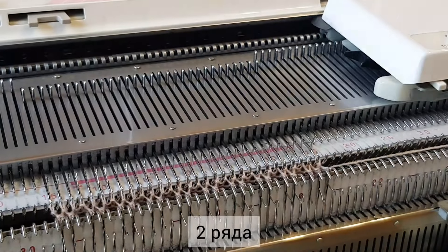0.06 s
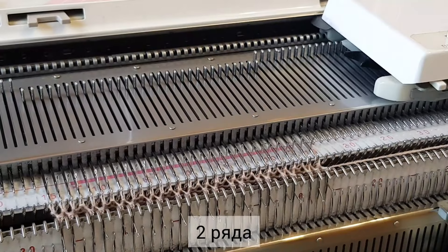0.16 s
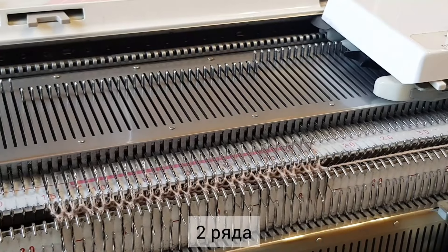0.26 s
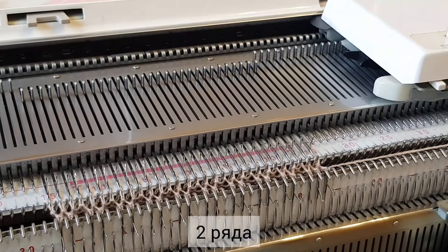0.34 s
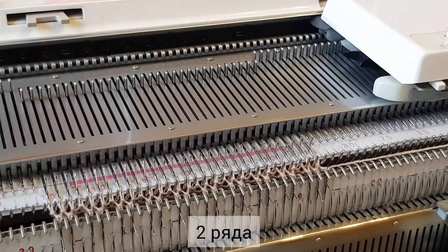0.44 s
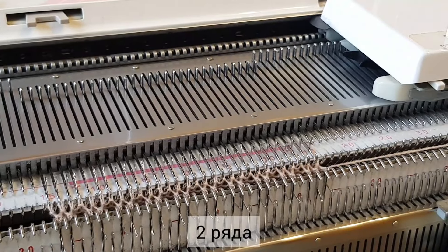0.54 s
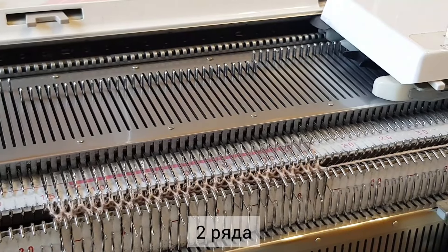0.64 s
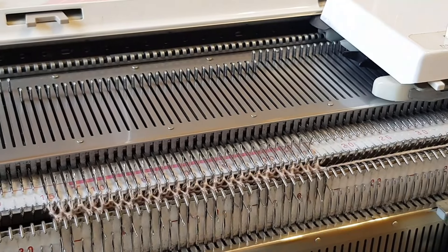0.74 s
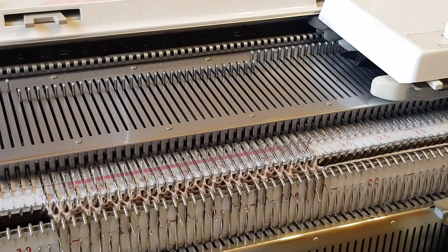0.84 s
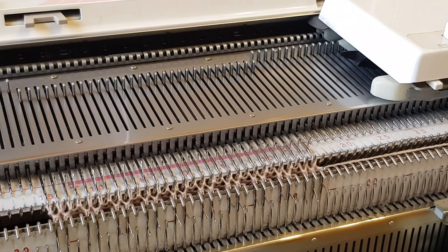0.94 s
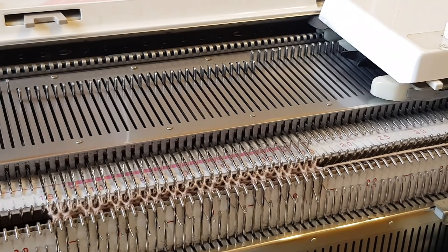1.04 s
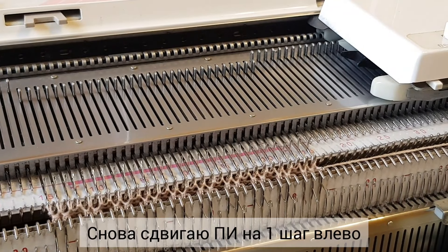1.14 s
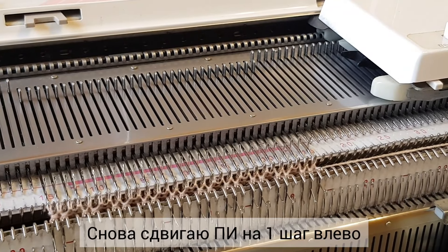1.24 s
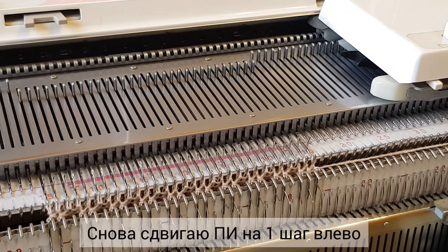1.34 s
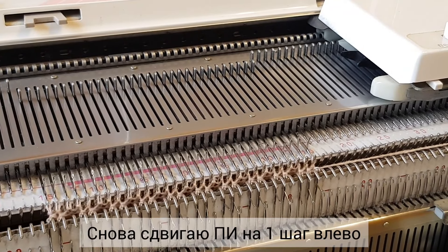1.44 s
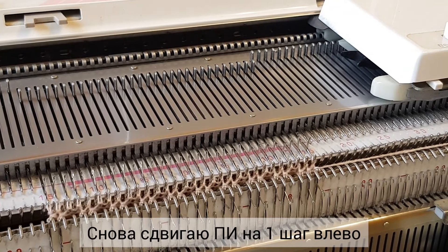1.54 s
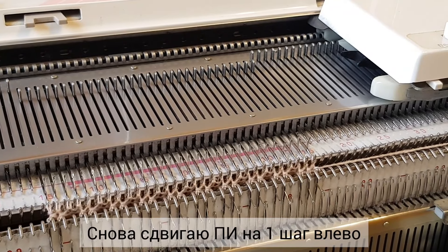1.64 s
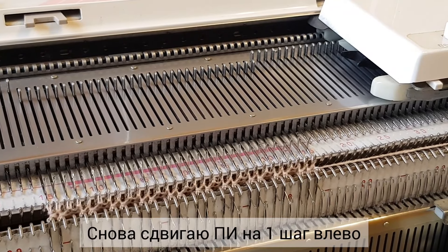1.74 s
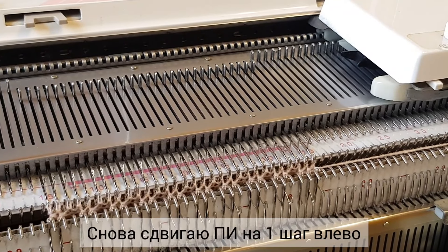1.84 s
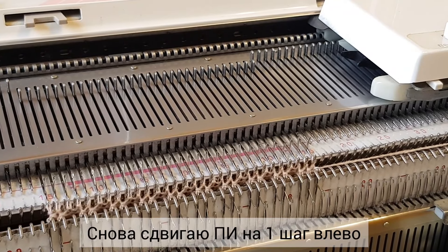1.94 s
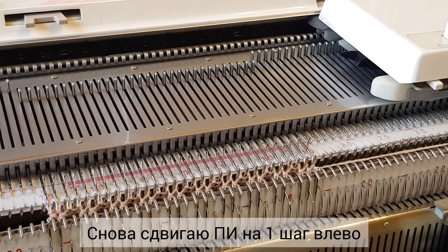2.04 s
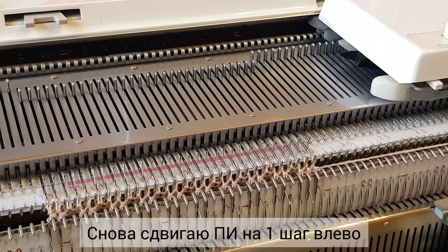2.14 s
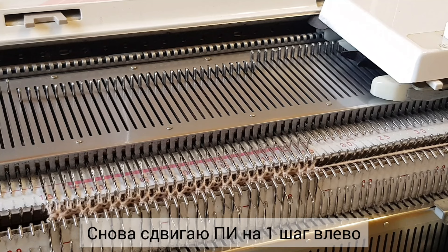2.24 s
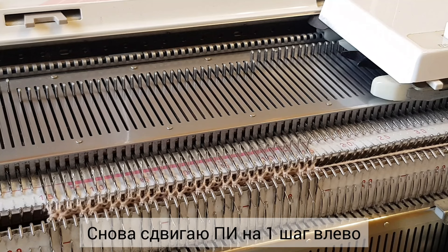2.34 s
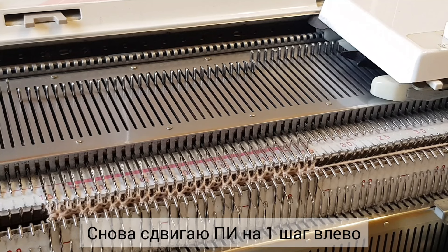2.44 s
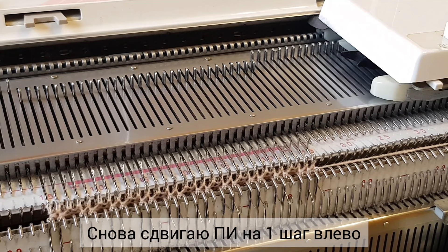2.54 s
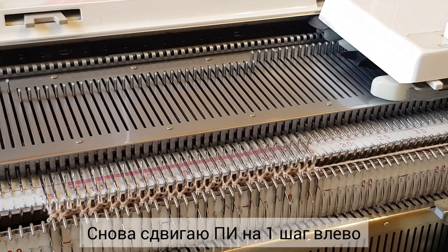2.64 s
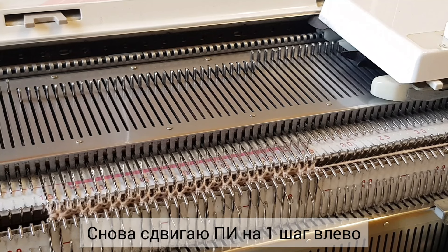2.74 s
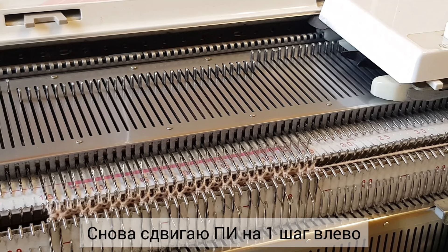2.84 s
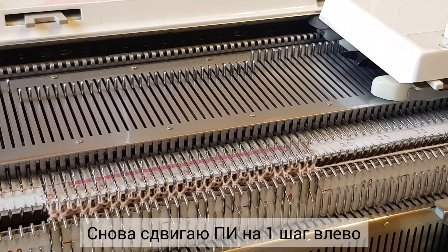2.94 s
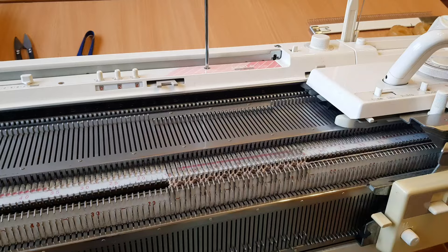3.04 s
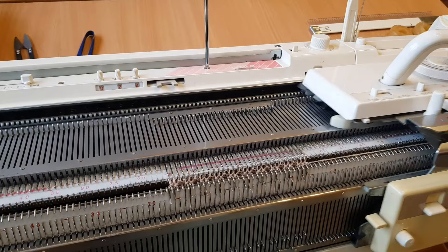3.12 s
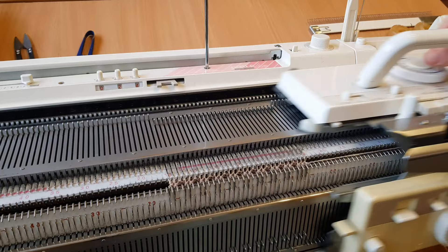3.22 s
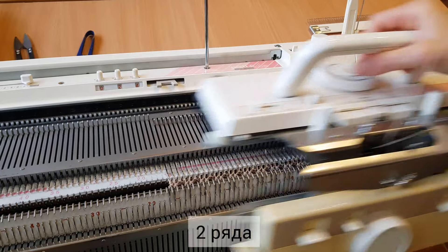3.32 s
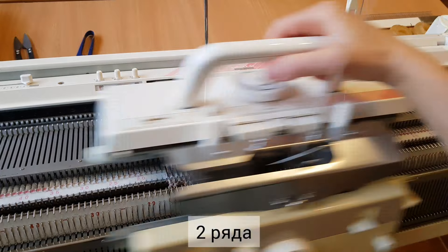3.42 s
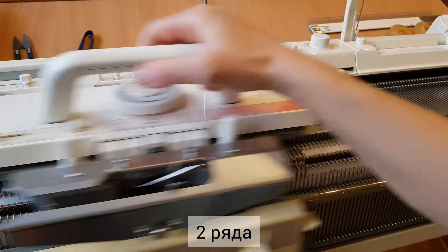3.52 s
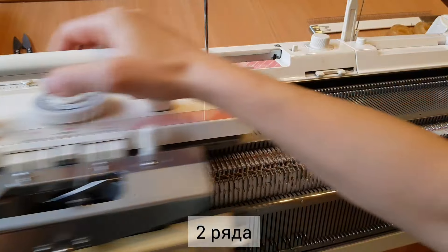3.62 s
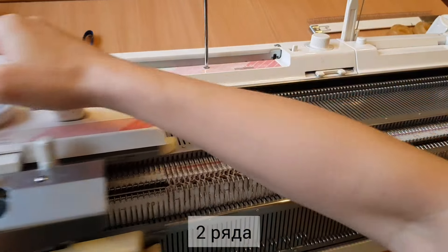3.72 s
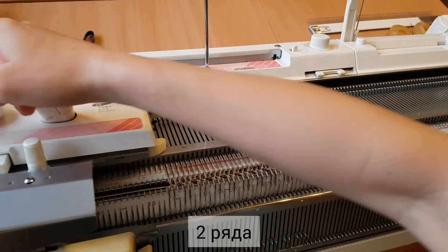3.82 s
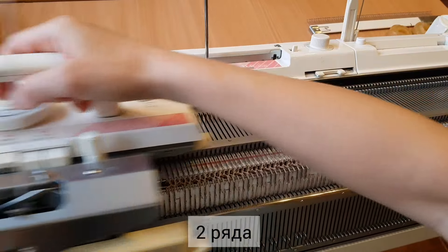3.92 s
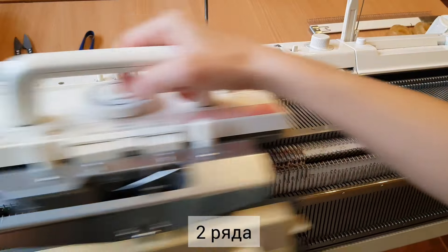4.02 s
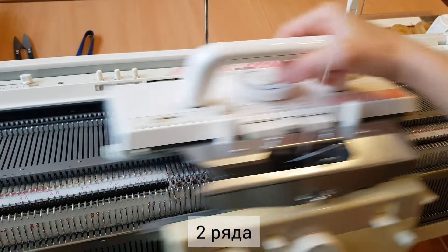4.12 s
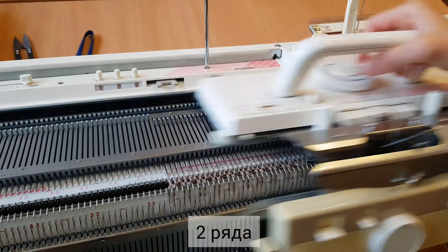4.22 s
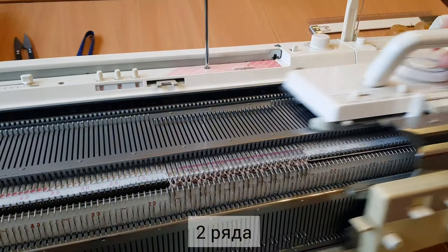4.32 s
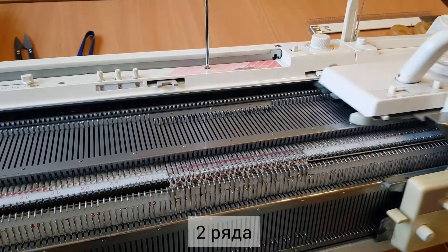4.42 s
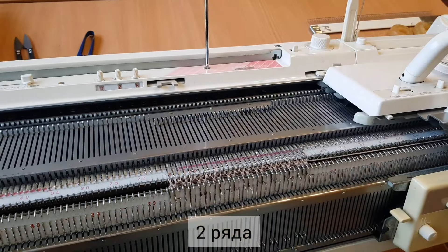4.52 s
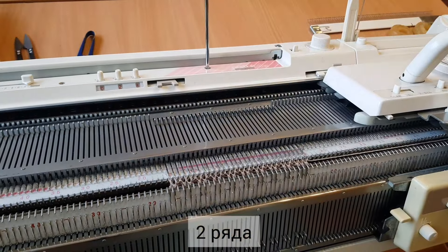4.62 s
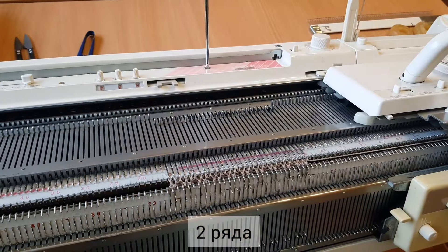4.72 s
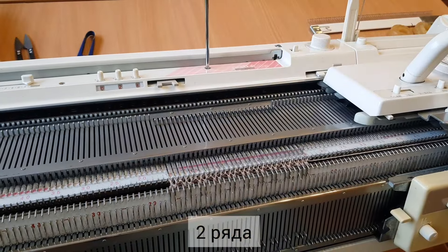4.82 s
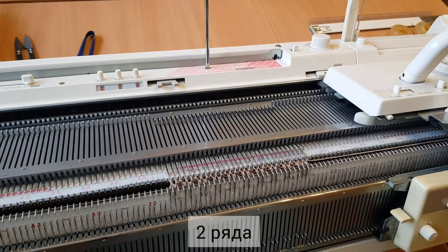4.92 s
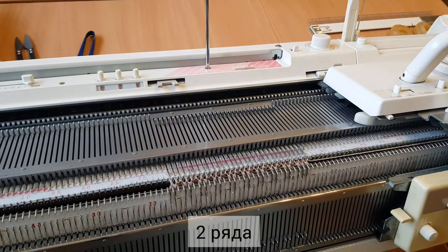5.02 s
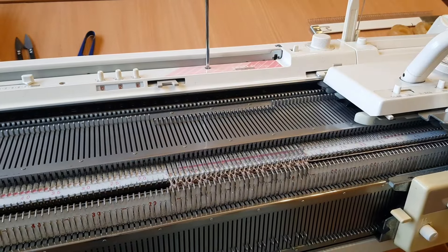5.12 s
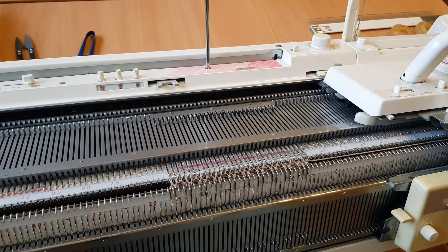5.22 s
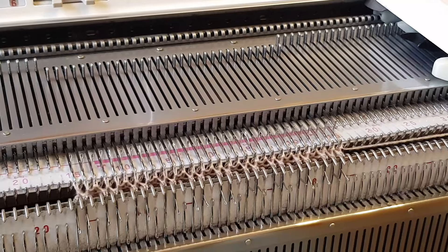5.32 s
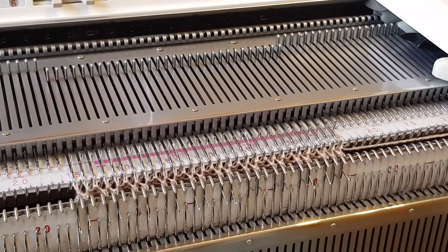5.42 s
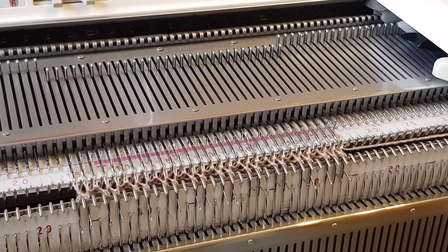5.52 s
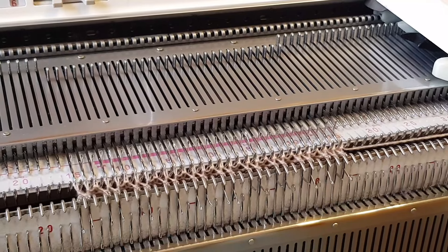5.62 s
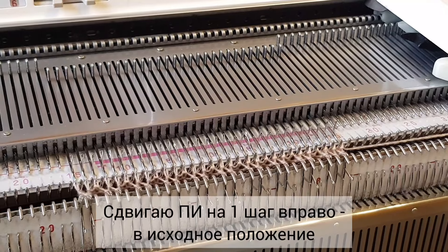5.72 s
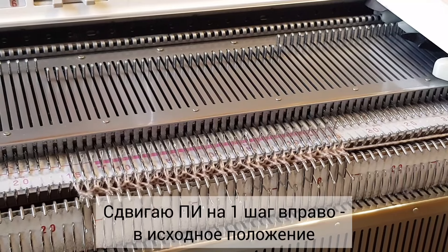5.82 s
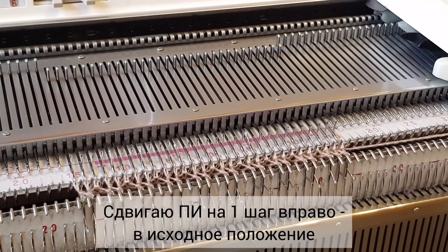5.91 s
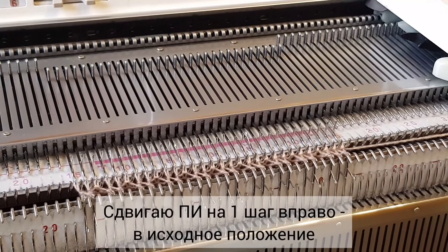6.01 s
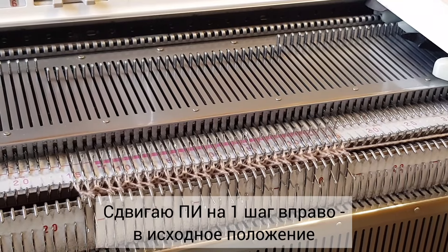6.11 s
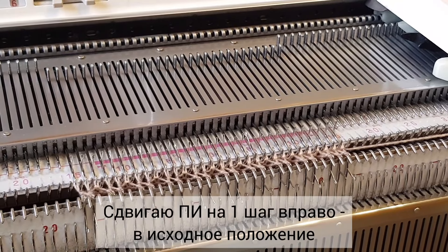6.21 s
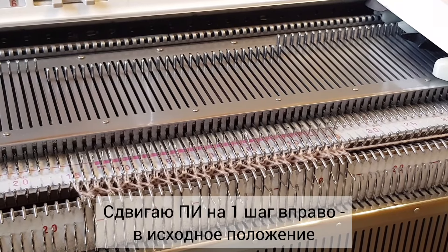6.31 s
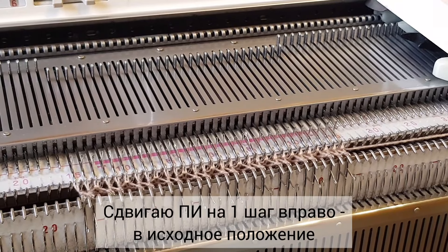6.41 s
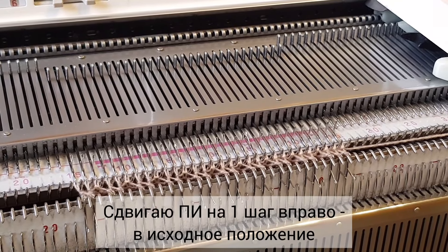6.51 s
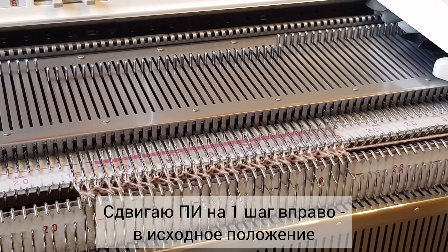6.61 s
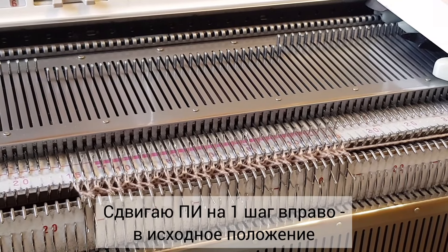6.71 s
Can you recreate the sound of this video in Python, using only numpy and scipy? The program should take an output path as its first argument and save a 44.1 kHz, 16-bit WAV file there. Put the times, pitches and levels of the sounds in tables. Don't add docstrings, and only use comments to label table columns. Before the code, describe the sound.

After a quiet opening, a lever clunks dully, then a knitting machine carriage rasps loudly out and back over needles, and a softer clunk follows.

```python
import sys
import numpy as np
from scipy import signal
from scipy.io import wavfile

SR = 44100
rng = np.random.default_rng(int(sys.argv[2]) if len(sys.argv) > 2 else 0)


def boost_factor(decibels):
    exponent = np.asarray(decibels, float) / 20
    return 10 ** exponent


def wav_record(signal):
    frames = np.transpose(np.atleast_2d(signal))
    bounded = np.clip(frames, -1, 1)
    quanta = np.round(bounded * 32767).astype(np.int16)
    wavfile.write(sys.argv[1], SR, quanta)


N = 298097

# frequency in Hz, level in dB per Hz.
RASP_SPECTRUM = [(180, -36), (300, -7.5), (372, -2), (528, -6.5), (603, 1.5), (656, -4.5), (994, -0.5),
                 (1640, -5.5), (3290, -4.5), (3760, -12), (4990, -6.5), (6410, -9.5), (8090, -11),
                 (12700, 2.5), (16000, -8)]
# frequency in Hz, likeness from -1 to 1.
MACHINE_LIKENESS = [(60, 0.88), (130, 0.94), (290, 0.8), (640, 0.29), (1410, 0.2), (3100, -0.01),
                    (6820, 0.0), (15000, -0.01)]
# frequency in Hz, level in dB, 60 dB decay in seconds.
BED_MODES = [(58, -7, 0.53), (129.7, -7, 0.6), (172.5, 0, 0.2), (208.2, -10, 0.46), (339, -17, 0.13),
             (391, -22, 0.5), (447, -26, 1), (563, -26.5, 0.43), (824, -29, 0.16)]


def curves(tables, rest):
    t = np.arange(N) / SR
    out = None
    for rows in tables:
        s, *columns = np.transpose(rows)
        if out is None:
            out = np.full((len(columns), N), rest)
        inside = (t >= s[0]) & (t <= s[-1])
        out[:, inside] = [np.interp(t[inside], s, c) for c in columns]
    return out


def rms_one(x):
    return x / np.sqrt(np.mean(x ** 2) + 1e-20)


def at_hz(points, hz):
    points_hz, values = np.transpose(points)
    return np.interp(np.log(hz), np.log(points_hz), values)


def sides(pan_db):
    return boost_factor(np.multiply.outer([.5, -.5], pan_db))


def drift(rate):
    r = np.exp(-80 * np.pi * rate / SR)
    slow = signal.lfilter([1], [1, -2 * r, r * r], rng.standard_normal(N // 40 + 2002))[2000:]
    return np.interp(np.arange(N) / 40, np.arange(len(slow)), rms_one(slow))


def ring(x, hz, t60):
    r = boost_factor(-60 / (t60 * SR))
    w = 2 * np.pi * hz / SR
    return signal.lfilter([0, np.sin(w)], [1, -2 * r * np.cos(w), r * r], x + 1e-18)


def clicks(times, gains):
    out = np.zeros(np.shape(gains)[:-1] + (N,))
    out[..., (np.asarray(times) * SR).astype(int)] = gains
    return out


def fades(times, gains, t60s):
    out = np.zeros(np.shape(gains)[:-1] + (N,))
    for k, (s, t60) in enumerate(zip(times, np.clip(t60s, .005, 1))):
        tail = out[..., int(s * SR):int((s + 1.5 * t60) * SR)]
        tail += gains[..., k, None] * boost_factor(-60 * np.arange(tail.shape[-1]) / SR / t60)
    return out


def swells(rows):
    t = np.arange(N) / SR
    out = 0
    for s, db, rise, fall in rows:
        away = np.maximum((s - t) / max(rise, .02), (t - s) / max(fall, .02))
        out = out + boost_factor(db - 60 * away)
    return out


def coloured(spectrum, edges, likeness, grain=1, patchy_db=0., balance=((1, 0), (2, 0))):
    out = 0
    white = grain * rng.standard_normal((2, 2, N))
    steps = np.geomspace(*edges, 1 + round(2 * np.log2(edges[1] / edges[0])))
    for k, (low, high) in enumerate(zip(steps, steps[1:])):
        band = signal.butter(2, [low, high], "band", fs=SR, output="sos")
        mid, side = signal.sosfilt(band, white[k % 2])
        hz = np.sqrt(low * high)
        alike = np.clip(at_hz(likeness, hz), -1, 1)
        flicker = boost_factor(patchy_db * drift(15.5)) if patchy_db else 1
        gain = boost_factor(at_hz(spectrum, hz)) * sides(at_hz(balance, hz))[:, None]
        stereo = np.sqrt(1 + alike) * mid + np.sqrt(1 - alike) * side * [[1], [-1]]
        out = out + gain * flicker * stereo
    return rms_one(out)


def resonant(modes):
    out = 0
    for hz, width, db in modes:
        t60 = np.log(1000) / np.pi / width
        out = out + boost_factor(db) * rms_one(ring(rng.standard_normal(N), hz, t60))
    return out


def room():
    # start in seconds, level in dB of rumble, house, hiss and fan.
    steady = [
        (0, -84, -68, -89, -79),
        (.835, -73, -61, -82, -90),
        (3.75, -81, -68.5, -89, -88.5),
        (5.275, -73.5, -60, -82, -73.5),
    ]
    # top in seconds, level in dB, rise and fall over 60 dB in seconds.
    rumble_swells = [
        (1.48, -49.5, .35, .75),
        (1.75, -73.5, 0.81, 5.5),
        (3.138, -62, .5, -1),
        (6.14, -59, 0.71, 2),
        (6.65, -51.5, 1.8, 0.7),
    ]
    house_swells = [
        (0.0, -56.5, .1, 0.69),
        (1.4, -54, .5, 1.13),
        (5.36, -61.5, 0.25, 0.7),
        (6.12, -59, 0.82, 0.88),
    ]
    fan_swells = [
        (5.43, -64, 0.83, 1.7),
    ]
    # frequency in Hz, level in dB per Hz.
    house_spectrum = [(53, -44), (90, -15), (114, -8.5), (243, -4), (268, -8), (345, -12.5), (369, -17),
                      (415, -14), (526, -17), (562, -14.5), (748, -15.5), (979, -22), (5000, -44),
                      (6500, -74), (11000, -120)]
    fan_spectrum = [(410, -30), (700, -1.5), (1140, -4.5), (1530, -6.5), (1690, -16), (1970, -14.5),
                    (2220, -21), (2600, -22), (3380, -52), (5720, -120)]
    hiss_spectrum = [(1470, -30), (2500, 0), (4410, -8), (4990, -7), (8020, -18.5), (12600, -6), (15200, 2),
                     (16000, -5)]
    # frequency in Hz, left-right likeness from -1 to 1.
    room_likeness = [(60, 0.85), (180, 0.15), (550, 0.64), (1650, -0.38), (4970, -0.06), (15000, 0.15)]
    # frequency in Hz, left minus right in dB.
    room_balance = [(60, 0), (110, -4), (200, 2), (380, 0.5), (700, 5), (1290, 4.5), (2380, 0.5),
                    (4400, 2.5), (8120, 1.0), (15000, 0.0)]
    # frequency in Hz, width in Hz, level in dB.
    hum_modes = [(55.4, 14, 0), (38, 22, -12)]
    drone_modes = [(270, 20, -2), (195, 20, -7.5), (122, 63, -12.5)]

    starts, *levels_db = np.transpose(steady)
    stretch = np.searchsorted(starts, np.arange(N) / SR, "right") - 1
    hum_gain, house_gain, hiss_gain, fan_gain = boost_factor(np.array(levels_db))[:, stretch]

    hum = rms_one(resonant(hum_modes))
    house = coloured(house_spectrum, (90, 5000), room_likeness, patchy_db=1.5, balance=room_balance)
    house = rms_one(house + resonant(drone_modes) * sides(2.5)[:, None])
    fan = coloured(fan_spectrum, (900, 1900), room_likeness, patchy_db=0.1, balance=room_balance)
    duct = signal.butter(6, 1750, fs=SR, output="sos")
    fan = rms_one(signal.sosfilt(duct, fan))
    hiss = coloured(hiss_spectrum, (4000, 17000), room_likeness)

    out = np.hypot(hum_gain, swells(rumble_swells)) * hum
    out = out + np.hypot(house_gain, swells(house_swells)) * house
    out = out + np.hypot(fan_gain, swells(fan_swells)) * fan
    return out + boost_factor(2.0) * hiss_gain * hiss


def rod():
    # frequency in Hz, 60 dB decay in seconds.
    rod_modes = [(4353, .45), (4311, .65), (4334, .45)]
    # strike in seconds, level in dB of each of the three modes.
    strikes = [
        (.001, -65.5, -67.5, -67.5),
        (3.70, -63, -73.5, -71),
        (3.781, -61.5, -74, -75),
        (4.271, -63.5, -63, -60.5),
    ]
    s, *levels_db = np.transpose(strikes)
    gains = boost_factor(np.array(levels_db))
    loose_play = fades(s, gains * boost_factor(-32), np.full(len(s), .45))
    force = clicks(s, gains) + rng.standard_normal(N) * loose_play
    rings = sum(ring(f, hz, t60) for f, (hz, t60) in zip(force, rod_modes))
    flutter = boost_factor(2.27 * drift(10.0))
    return rings * flutter * sides(6.0)[:, None]


def bed(force, damping, cut_hz):
    shares = sides(1.5 + 2.3 * rng.standard_normal(len(BED_MODES))).T
    rings = 0
    for share, f, (hz, db, t60) in zip(shares, force, BED_MODES):
        decay_s = damping * min(t60, 110 / hz + .15)
        rings = rings + share[:, None] * boost_factor(db) * ring(f, hz, decay_s)
    return signal.sosfilt(signal.butter(3, cut_hz, "high", fs=SR, output="sos"), rings)


def lever():
    # blow in seconds, peak in dB, hardness as dB of the upper modes, rustle in dB,
    # extra of the table top in dB.
    blows = [(0.001, -50.5, -13, -62.5, 0.5), (0.073, -48, -9, -67, -6), (0.893, -48.5, -2, -64.5, -4),
             (0.914, -53, 2, -69, -4), (1.317, -32.5, 2, -38, -6), (1.329, -23, -4.5, -42.5, -10),
             (1.349, -19.5, -20, -53, -8), (1.367, -24.5, -10, -56.5, -23), (1.395, -32, -23, -59, 6),
             (3.087, -45.5, -15, -58.5, 5), (3.118, -44.5, -12, -64.5, 2), (3.239, -51, -0.5, -60, -5),
             (5.359, -64.5, -6.5, -60.5, -0.5), (5.438, -49.5, -5.5, -48, -2),
             (5.454, -58.5, -7.5, -58.5, 0), (5.477, -50, -2, -76, 3), (5.958, -34, -8, -35.5, -9.5),
             (5.972, -31, -12.5, -65.5, -16.5), (5.999, -28, -18.5, -56.5, -3.5)]
    # frequency in Hz, level in dB per Hz.
    clunk_spectrum = [(180, -35), (300, -6.5), (372, -3), (531, -14.5), (574, -12), (806, -9), (1060, -19),
                      (1180, -15.5), (1970, -24.5), (2450, -24), (2770, -32), (4830, -34.5), (7440, -48),
                      (12000, -42.5), (15600, -74), (22000, -120)]
    s, low_db, hard_db, rustle_db, top_db = np.transpose(blows)
    t60 = np.full(len(s), .22)
    chance = rng.standard_normal((len(s), 2, len(BED_MODES)))
    upper = np.array(BED_MODES)[:, 0] > 280
    level_db = low_db[:, None] - 6.5 + upper * (hard_db[:, None] + 12.5) + 2.0 * chance[:, 0]
    level_db[:, 1] += top_db
    force = clicks(s, (boost_factor(level_db) * np.sign(chance[:, 1])).T)

    frame = coloured(clunk_spectrum, (300, 2700), MACHINE_LIKENESS)
    frame = frame * fades(s, boost_factor(rustle_db - 2.0), 1.3 * t60)
    needles = coloured(clunk_spectrum, (2700, 12000), MACHINE_LIKENESS)
    needles = needles * fades(s, boost_factor(rustle_db - 16.5), 0.73 * t60)
    return bed(force, damping=0.97, cut_hz=40) + (frame + needles) * sides(3.1)[:, None]


def steel(s, levels_db, pan_db, scatter_db, tail_db, tail_s):
    # frequency in Hz, level in dB, 60 dB decay in seconds.
    steel_modes = [(9030, -1.5, 0.041), (13100, -9, 0.014), (3100, -1, 0.012), (3700, -3, .012),
                   (5040, 2, 0.043), (10300, 0, 0.011), (5860, -3, 0.016)]
    part_of_mode = [0, 0, 1, 2, 3, 3, 0]
    chance = rng.standard_normal((len(s), 2 * len(steel_modes)))
    echoes = rng.standard_normal((2, N))
    out = 0
    for k, ((hz, db, t60), part) in enumerate(zip(steel_modes, part_of_mode)):
        gains = boost_factor(levels_db[part] + db + scatter_db * chance[:, 2 * k:2 * k + 2].T)
        echo_gains = gains * boost_factor(tail_db) * np.sqrt(.012 / t60)
        echo_s = np.full(len(s), tail_s * (3700 / hz) ** .7)
        force = clicks(s, gains) + echoes * fades(s, echo_gains, echo_s)
        out = out + ring(force, hz, t60)
    return out * sides(pan_db)[:, None]


def catch():
    # snap in seconds, level in dB of its spring, pin, pawl and plate.
    snaps = [(.0543, -75, -57, -71, -77), (.0728, -51.5, -58, -46, -77), (.8545, -71, -76, -63, -83),
             (1.284, -63, -90, -90, -76), (1.3294, -43, -70, -46, -52), (3.0674, -55, -81, -48.5, -72),
             (3.68, -27.5, -21, -39, -50), (3.781, -48, -65, -60, -44), (3.94, -56.5, -62, -60.5, -75.5),
             (3.975, -72, -57, -56.5, -71), (4.4846, -75.5, -73.5, -64, -72.5),
             (5.6102, -73.5, -87.5, -92, -80.5), (5.9453, -57, -56.5, -46.5, -59)]
    s, *levels_db = np.transpose(snaps)
    return steel(s, levels_db, pan_db=2.0, scatter_db=1.0, tail_db=-22.5, tail_s=.13)


def latches():
    # start in seconds,
    # peak in dB of the bright crack, level in dB of its duller part, left minus right in dB.
    rack_ticks = [(0.8536, -68, -63, -1), (1.2411, -63, -76, 6), (1.2724, -59, -83.5, 0),
                  (1.283, -57, -82, 1.5), (1.292, -48, -76, 5.5), (1.313, -52, -59, 1),
                  (1.3164, -50, -45.5, 11), (1.3268, -59, -43.5, -7), (5.348, -73.5, -74, 5),
                  (5.424, -70.5, -55, 5.5), (5.6101, -65.5, -73.5, 6.5), (5.946, -45, -39.5, 4)]
    cam_ticks = [(0.0706, -53, -51, 4), (3.0692, -59, -56, -4), (3.1704, -59, -79, 4),
                 (3.1807, -51, -66, 7.5), (3.197, -49, -69, 13), (3.2294, -58, -70, -1),
                 (3.236, -49, -76, 3), (3.2791, -43, -60, 8), (3.2974, -50, -49, 3), (3.3081, -43, -56, 4),
                 (3.331, -38, -41, -2), (3.3588, -28, -40, 7), (3.382, -13, -29, 6), (3.4532, -14, -16, 12),
                 (3.679, -15.5, -20.5, 5.5), (3.781, -36.5, -53, 4), (3.902, -52.5, -80.5, 11.5),
                 (3.926, -55, -71, 19), (3.984, -48.5, -52.5, 9), (4.038, -22.5, -33, 7),
                 (4.2806, -27, -26.5, 2), (4.3274, -54, -43, 3.0), (4.4114, -55, -81, -1)]
    s, bright_db, dull_db, pan_db = np.transpose([*rack_ticks, *cam_ticks])
    rack_tail, cam_tail = (0.24, -9.5), (0.067, -13)
    tails = [rack_tail] * len(rack_ticks) + [cam_tail] * len(cam_ticks)
    t60, tail_db = np.transpose(tails)
    out = 0
    for edges, db, longer in (((7000, 17000), bright_db, 1), ((1500, 7000), dull_db, 1.3)):
        gains = boost_factor(db - 6.0) * sides(pan_db)
        crack = fades(s, gains, np.full(len(s), .03))
        tail = fades(s, gains * boost_factor(tail_db), longer * t60)
        shape = signal.lfilter([.04], [1, -.96], crack + tail)
        out = out + coloured(RASP_SPECTRUM, edges, MACHINE_LIKENESS) * shape
    return out


def knocks():
    # knock in seconds, peak in dB, pitch in Hz.
    housing_knocks = [
        (.896, -54.5, 620),
        (3.232, -50.5, 489),
        (3.457, -26, 636),
        (3.515, -24.5, 1017),
        (3.595, -34, 395),
        (4.04, -38.5, 340),
        (4.252, -26, 609),
        (5.456, -51.5, 801),
    ]
    rings = sum(ring(clicks([s], [boost_factor(db)]), hz, t60=.09) for s, db, hz in housing_knocks)
    return rings * sides(4.0)[:, None]


def contacts(per_s, spread_db, t60, smooth):
    uneven = boost_factor(spread_db * np.minimum(rng.exponential(1, N), 4))
    hits = (rng.random(N) < per_s / SR) * uneven
    bursts = signal.lfilter([1], [1, -boost_factor(-60 / (t60 * SR))], hits)
    return smooth + rms_one(bursts)


def pings(per_s, low_hz, high_hz, t60, spread_db, count):
    sizes = boost_factor(spread_db * np.minimum(rng.exponential(1, (2, N)), 4)) * rng.choice([-1, 1], (2, N))
    hits = sizes * (rng.random((2, N)) < per_s / SR)
    dealt = rng.integers(0, count, (2, N))
    pitches = np.geomspace(low_hz, high_hz, count) * boost_factor(.2 * rng.standard_normal(count))
    out = 0
    for k, hz in enumerate(pitches):
        gain = boost_factor(at_hz(RASP_SPECTRUM, hz)) * np.sqrt(hz)
        out = out + gain * ring(hits * (dealt == k), hz, t60)
    return rms_one(out)


def follows(needles_db, load_db, offset_db, of_needles, of_load):
    return boost_factor(offset_db + of_needles * needles_db + of_load * load_db)


def lingers(gain, t60):
    fall_db = 60 * np.arange(N) / SR / t60
    return boost_factor(np.maximum.accumulate(20 * np.log10(gain) + fall_db) - fall_db)


def carriage():
    # time in seconds, needles in the cams in dB, load on the bed in dB.
    run_out = [
        (0.0, -64, -59),
        (.066, -76, -71),
    ]
    stroke_out = [
        (3.139, -79.5, -67),
        (3.29, -63, -73),
        (3.368, -37.5, -53),
        (3.388, -22, -51),
        (3.48, -18.5, -40),
        (3.623, -28, -27.5),
        (3.701, -41, -45.5),
        (3.793, -61.5, -56.5),
        (3.844, -80.5, -64),
    ]
    stroke_back = [
        (3.919, -75, -50.5),
        (4.019, -48.5, -62),
        (4.034, -33.5, -58),
        (4.092, -21.5, -48.5),
        (4.142, -17, -31.5),
        (4.26, -24.5, -38),
        (4.332, -57.5, -47.5),
        (4.436, -67.5, -56.5),
        (4.56, -102, -64.5),
    ]
    needles_db, load_db = curves([run_out, [*stroke_out, *stroke_back]], -140.)

    butts = contacts(500, spread_db=3.0, t60=0.006, smooth=1.7)
    needle_grain = contacts(700, spread_db=1.0, t60=.015, smooth=1.2)
    rattle = coloured(RASP_SPECTRUM, (5500, 17000), MACHINE_LIKENESS, needle_grain, patchy_db=1.5)
    scrape = coloured(RASP_SPECTRUM, (1500, 5500), MACHINE_LIKENESS, butts, patchy_db=1.5)
    housing = coloured(RASP_SPECTRUM, (280, 1500), MACHINE_LIKENESS, butts, patchy_db=2.5)
    rattle = rattle + boost_factor(-2) * pings(2500, 5600, 15600, t60=0.004, spread_db=2.5, count=22)
    scrape = scrape + boost_factor(-1.5) * pings(1100, 1550, 5300, t60=0.033, spread_db=1.0, count=12)

    shake = [rng.standard_normal(N)] * len(BED_MODES)
    rumble = boost_factor(load_db) * rms_one(bed(shake, damping=0.3, cut_hz=76))

    scrape_gain = follows(needles_db, load_db, offset_db=-5.5, of_needles=0.82, of_load=0.12)
    housing_gain = follows(needles_db, load_db, offset_db=-9.5, of_needles=.7, of_load=0.15)
    rasp = boost_factor(needles_db) * rms_one(rattle) + scrape_gain * rms_one(scrape)
    rasp = rasp + lingers(housing_gain, t60=0.22) * housing
    return rasp * sides(3.5)[:, None] + rumble


def scene():
    return room() + rod() + lever() + catch() + latches() + knocks() + carriage()


def band_limit(x):
    return signal.sosfilt(signal.butter(12, 15900, fs=SR, output="sos"), x)


def record(dry):
    silences = [
        (.8165, .8545),
        (2.976, 3.0225),
        (5.2515, 5.299),
    ]
    t = np.arange(N) / SR
    kept = 1
    for start, end in silences:
        kept = kept * np.clip(np.maximum(start - t, t - end) / .002, 0, 1)
    top_cut = signal.ellip(12, .3, 60, 15900, fs=SR, output="sos")
    mix = signal.sosfilt(top_cut, dry * kept)
    return band_limit(mix)


dry = scene()
out = record(dry)
wav_record(out)
```